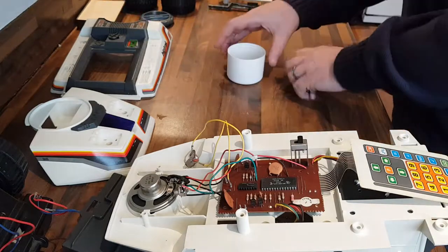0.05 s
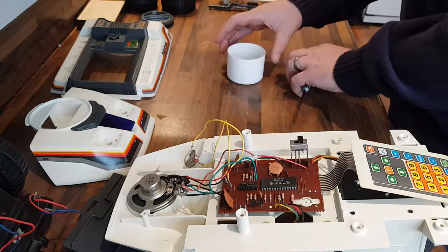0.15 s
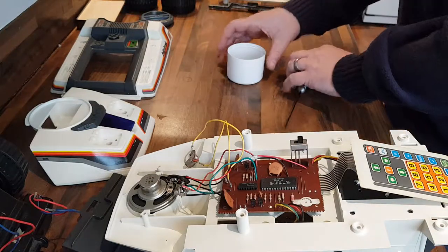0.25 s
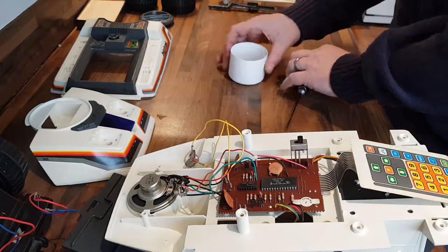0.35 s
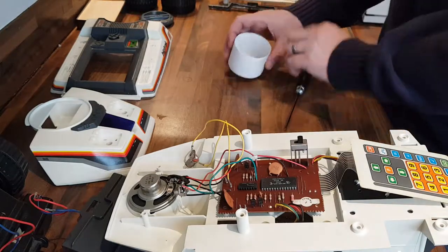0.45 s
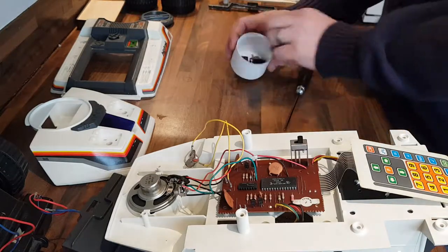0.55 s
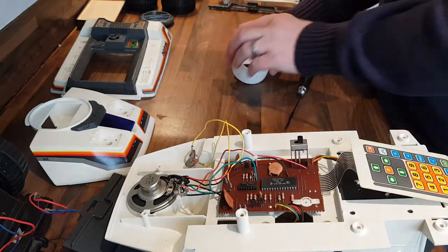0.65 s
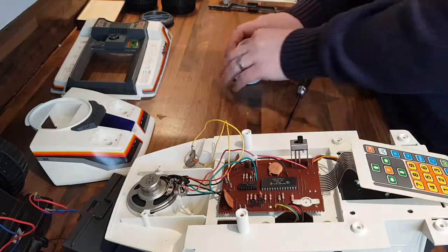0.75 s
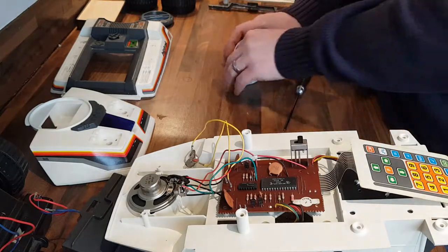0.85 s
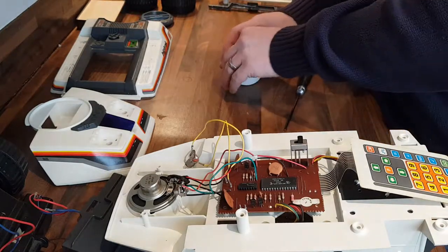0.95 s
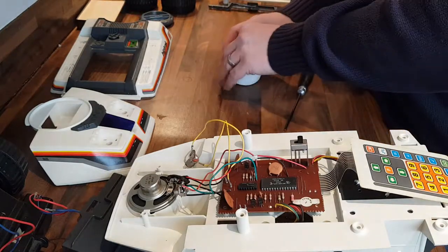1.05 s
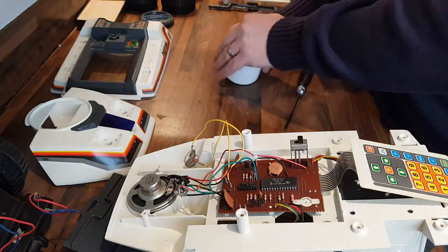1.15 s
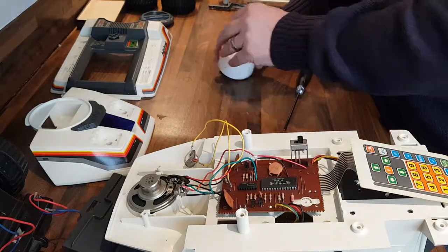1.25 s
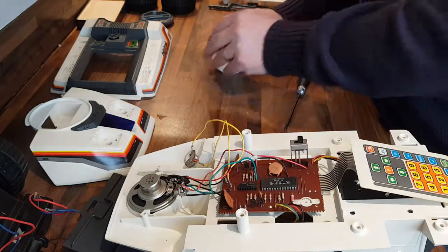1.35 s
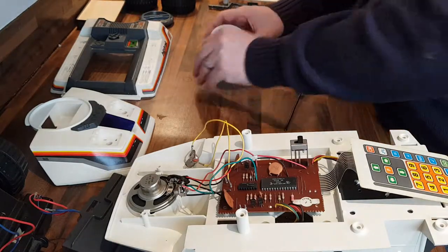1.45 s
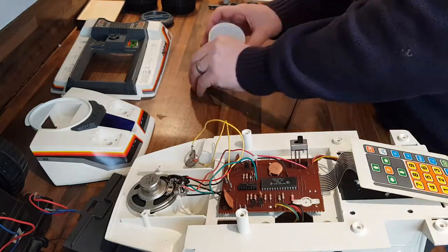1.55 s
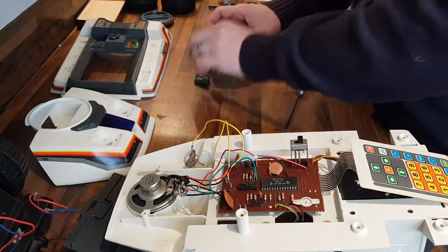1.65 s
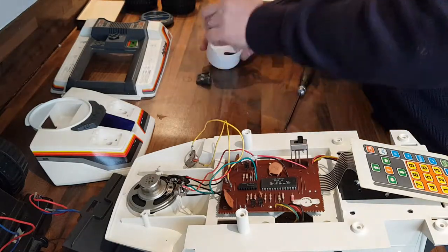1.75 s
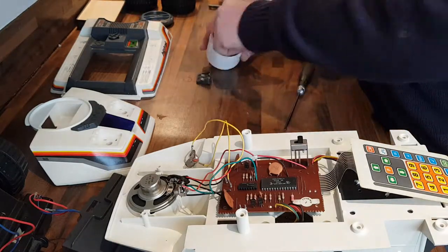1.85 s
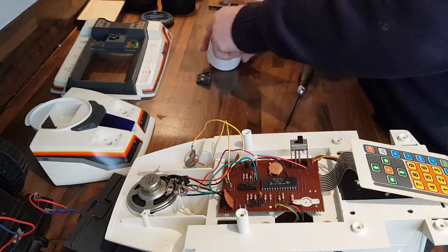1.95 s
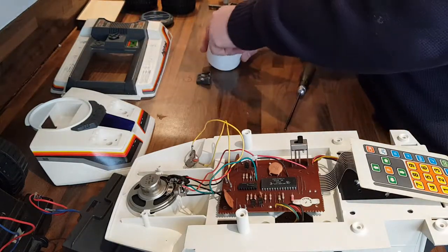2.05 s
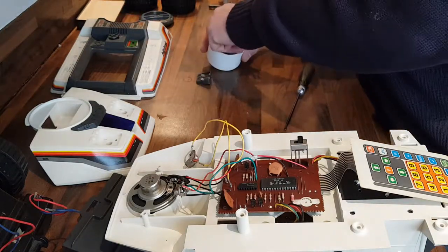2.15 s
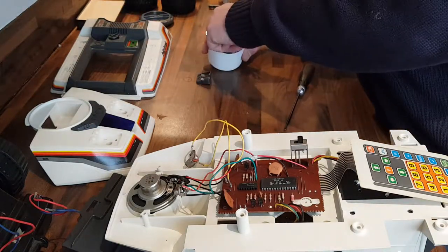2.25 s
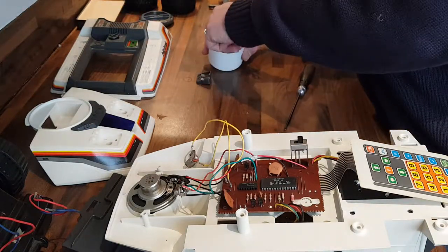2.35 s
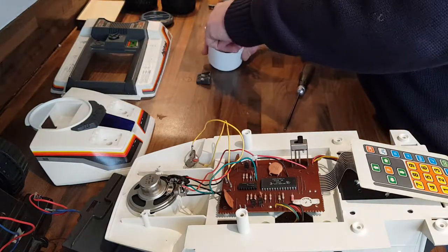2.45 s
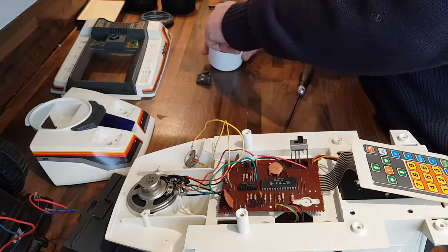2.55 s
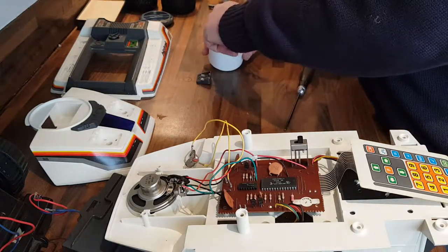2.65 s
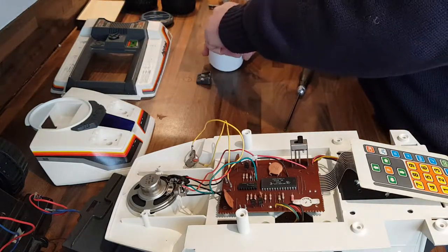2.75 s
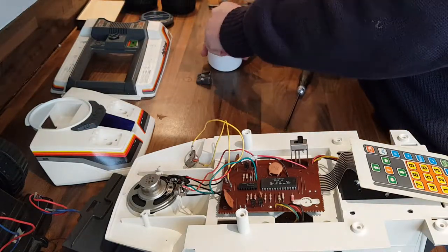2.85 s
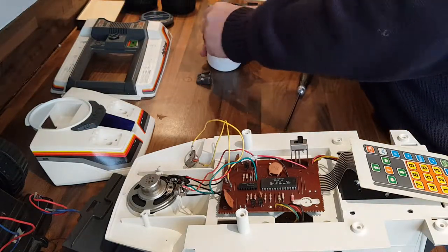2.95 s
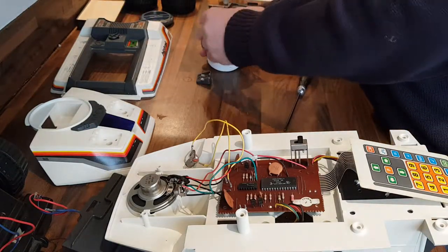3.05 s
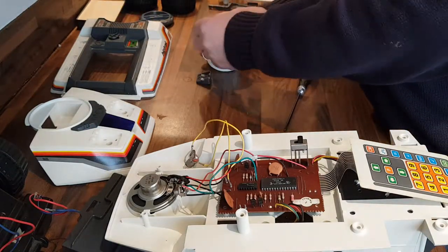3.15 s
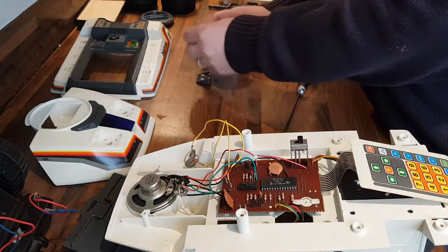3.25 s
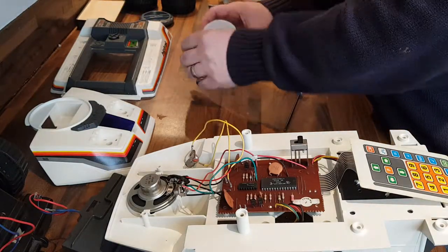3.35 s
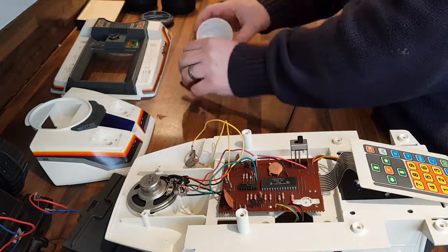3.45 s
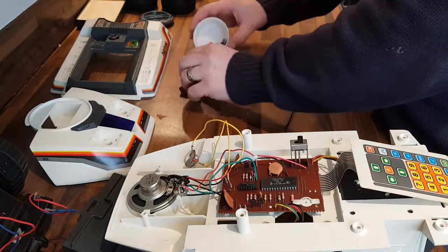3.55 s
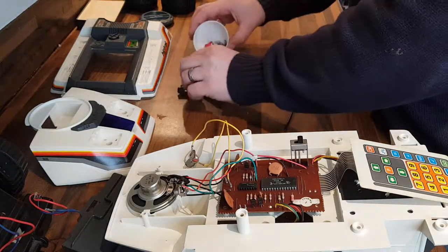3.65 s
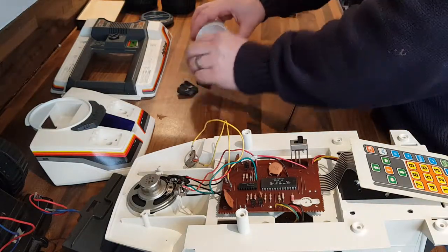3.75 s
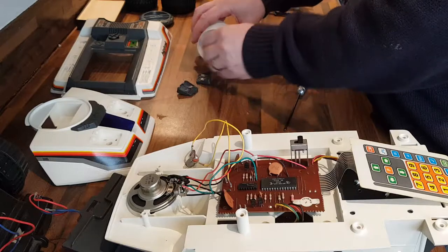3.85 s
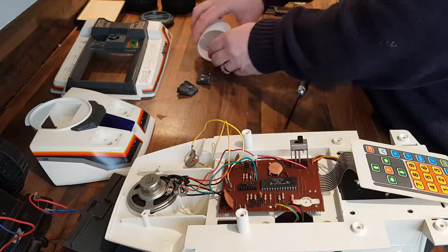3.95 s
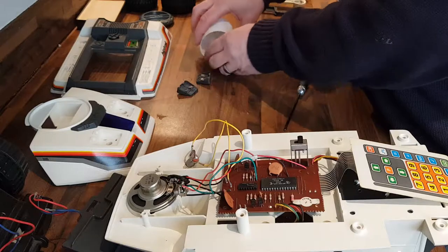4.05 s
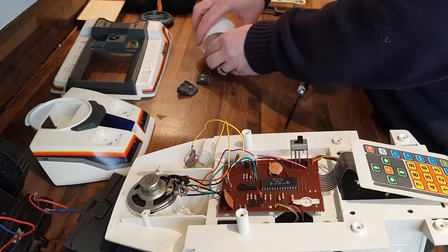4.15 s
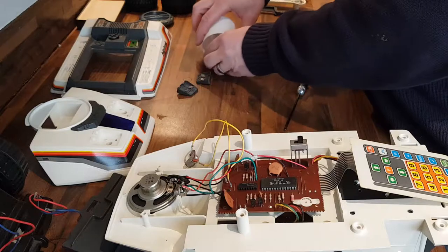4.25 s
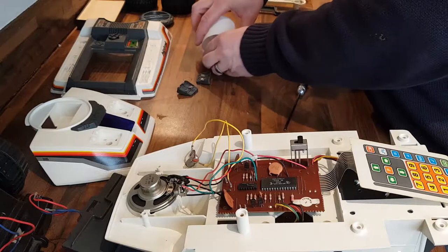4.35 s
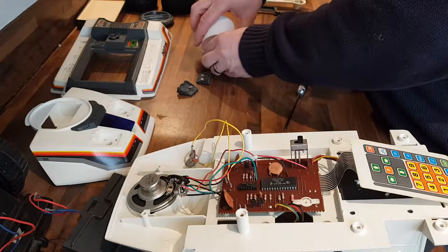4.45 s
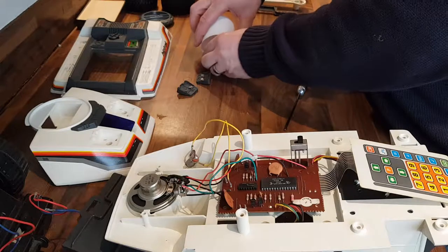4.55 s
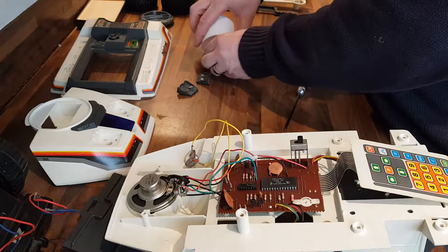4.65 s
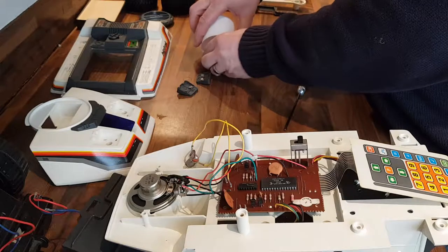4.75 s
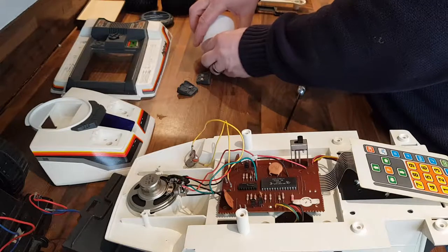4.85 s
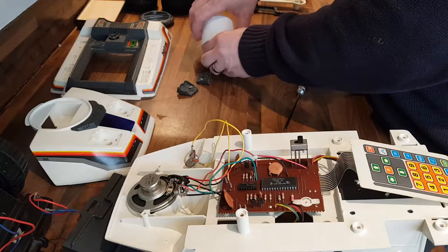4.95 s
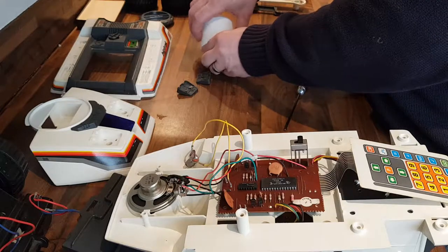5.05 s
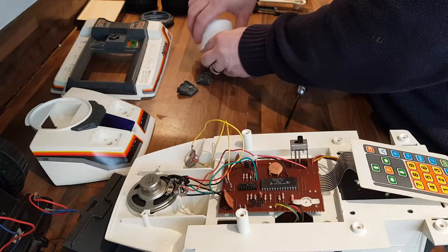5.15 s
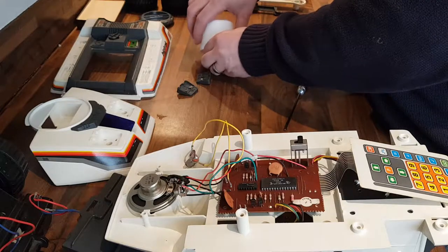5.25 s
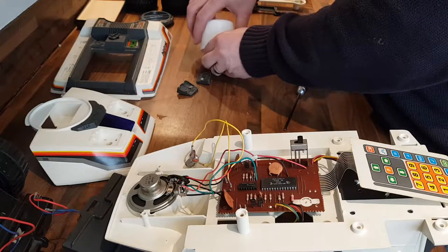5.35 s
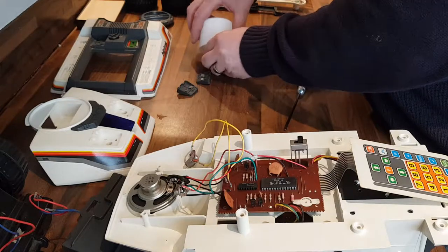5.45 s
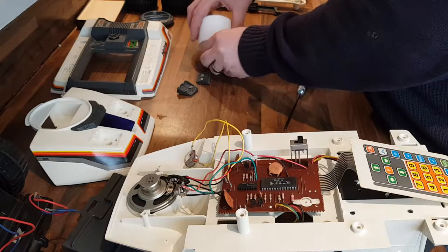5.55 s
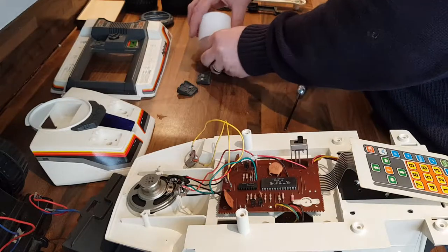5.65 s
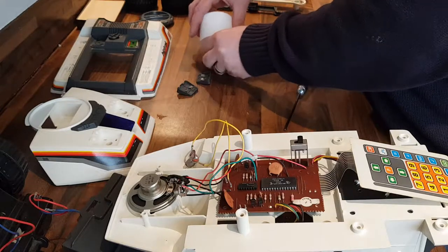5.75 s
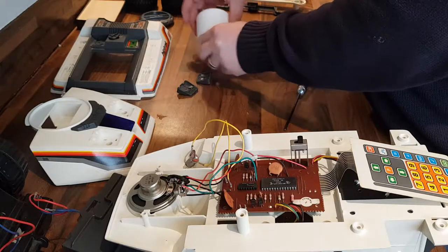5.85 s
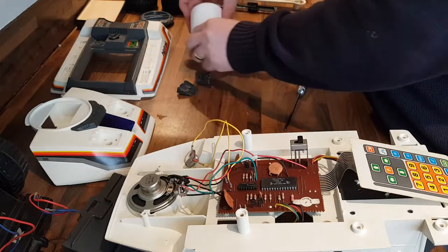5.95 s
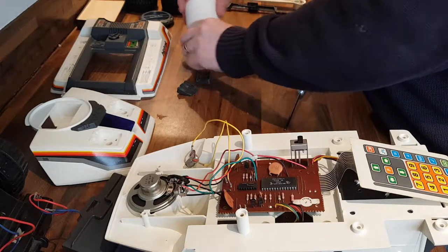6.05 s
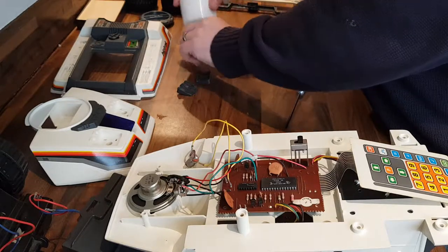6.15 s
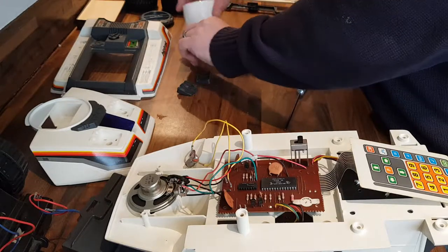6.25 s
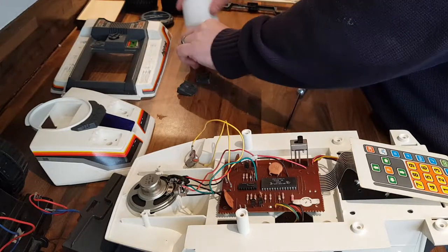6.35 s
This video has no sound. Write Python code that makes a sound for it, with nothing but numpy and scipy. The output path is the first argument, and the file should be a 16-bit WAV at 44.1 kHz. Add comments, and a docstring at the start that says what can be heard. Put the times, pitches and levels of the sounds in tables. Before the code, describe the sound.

Small steel screws give a brief hollow rattle in a plastic pot. At 0.3 seconds a screwdriver drops onto a wooden table and bounces quickly, with hard clacks, a low thud and a thin metallic ring: the loudest event. From 0.7 to 1.3 seconds the screws slide and knock inside the pot. Around 1.6 to 1.9 a few tumble onto the wood, clinking. Fingers stir the pot softly from 2 to 3 seconds, with sharper clicks near 2.6. After a light knock at 3.5, the screws are tipped out from 3.6 to 4 seconds in a bright, jingling spill with dull thumps. Another run of clicking and sliding lasts from 4.4 to 5.3, thinning to faint ticks by 5.8, with one last small tap at 6.3. Everything sounds close and slightly left, in a small room with short reverberation and faint electrical hum and hiss.

```python
"""In a small room, at a wooden table, steel screws rattle in a plastic pot, are stirred by fingers and tipped
out; a screwdriver also drops and bounces. Each impact is a brief force that excites the modes of what it
strikes: steel cracks and rings, the pot sounds hollow, and the table clacks and booms. The sliding
heap is a swarm of tiny impacts. The room reverberates, and mains hum and hiss lie under it all."""
import sys
import numpy as np
from scipy import signal
from scipy.fft import rfft, irfft, next_fast_len
from scipy.io import wavfile
from scipy.ndimage import map_coordinates

SR = 44100
rng = np.random.default_rng(int(sys.argv[2]) if len(sys.argv) > 2 else 0)


def waveform_to_disk(signal):
    """Save audio, clipped to [-1, 1], as 16-bit WAV at the path in sys.argv[1]."""
    frames = np.transpose(np.atleast_2d(signal))
    scaled = np.clip(frames, -1, 1) * 32767
    samples = np.round(scaled).astype(np.int16)
    wavfile.write(sys.argv[1], SR, samples)


N = 281799
FFT_SIZE = next_fast_len(N + SR // 2)
FREQS = np.fft.rfftfreq(FFT_SIZE, 1 / SR)


def amp(db):
    """Amplitude ratio of a level in decibels."""
    return 10 ** (np.asarray(db) / 20)


def unit(x):
    """Normalisation to an rms of 1."""
    return x / np.sqrt(np.mean(x ** 2) + 1e-20)


def pan(db):
    """Level difference: the left channel gains db and the right loses it."""
    return amp([[db], [-db]])


def along(points, hz=FREQS):
    """Interpolation of (Hz, value) points on a logarithmic frequency axis."""
    f, value = np.transpose(points)
    return np.interp(np.log(hz + 1), np.log(f + 1), value)


def filtered(x, response):
    """Linear filtering: the spectrum is multiplied by a frequency response."""
    return irfft(rfft(x, FFT_SIZE) * response, FFT_SIZE)[..., :N]


def colour(points):
    """Amplitude response of a spectral envelope of (Hz, dB) points."""
    return amp(along(points))


def modes(table):
    """Modal superposition: damped resonances (Hz, bandwidth Hz, dB) add with alternating sign."""
    return sum((-1) ** k * amp(db) * 1j * FREQS * width / (hz ** 2 - FREQS ** 2 + 1j * FREQS * width)
               for k, (hz, width, db) in enumerate(table))


def shifting_modes(x, table, radiation=1, scatter_db=3.5):
    """Modal coupling: as the struck spot moves, each mode is fed more or less."""
    knots = rng.standard_normal((len(table), 200))
    feeds = (amp(scatter_db * map_coordinates(row, [np.linspace(0, 195, N)], order=1)) for row in knots)
    return sum(filtered(x * feed, radiation * modes([mode])) for feed, mode in zip(feeds, table))


def bursts(times, gains, t60, apart):
    """Scattering draws impacts out into noise bursts; apart weights the noise unique to each channel."""
    t = np.arange(SR // 20) / SR
    age = t / t60
    noise = rng.standard_normal((len(times), 3, len(t))) * amp(-60 * age ** 1.312)
    noise *= 1 - np.exp(-age / 0.041)  # attack
    at = (np.round(times * SR).astype(int)[:, None] + np.arange(len(t))).ravel()
    gains = gains * np.ones((2, 1))
    sides = (gains[c, :, None] * (noise[:, 2] + apart * noise[:, c]) for c in range(2))
    return np.array([np.bincount(at, side.ravel(), N + SR)[:N] for side in sides])


def patter(per_s, spread_db, t60, apart):
    """Shot noise: small contacts at random moments, a few much stronger than the rest."""
    when, chance = rng.random((int(per_s * N / SR), 2)).T
    return bursts(when * N / SR, amp(-spread_db * np.log(chance + 0.018)), t60, apart)


def blows(rows, gain_db, soft_hz):
    """Contact compliance: each (seconds, dB) impulse carries little above soft_hz."""
    start, db = np.transpose(rows)
    pushes = np.bincount(np.round(start * SR).astype(int), amp(db + gain_db), N)
    return filtered(pushes, 1 / (1 + 1j * FREQS / soft_hz) ** 2)


def swells(rows, drop_db=27, roundness=1.995):
    """Incoherent swells add in power: an envelope per dB column of (peak s, rise s, fall s, dB, ..)."""
    peak, rise, fall, *levels = np.transpose(rows)
    t = np.arange(0, N / SR + .01, .002)
    late = t - peak[:, None]
    span = np.where(late < 0, rise[:, None], fall[:, None])
    shape = amp(-drop_db * np.abs(late / span) ** roundness)
    return [np.interp(np.arange(N) / SR, t, np.sqrt(amp(db) ** 2 @ shape ** 2)) for db in levels]


# Background noise. Each row: frequency in Hz, relative spectral density in dB.
NOISE_SPECTRUM = [(15, -43.5), (25, -16.5), (102, -7.5), (127, -15.5), (223, -31), (285, -29.5),
                  (420, -39.5), (516, -34.5), (1020, -39), (8830, -41.5), (16000, -39.5)]
# Its likeness at the two microphones. Each row: frequency in Hz, coherence from 0 to 1.
NOISE_COHERENCE = [(30, .93), (200, .93), (600, .3), (8000, .1)]

def hiss_and_hum(noise_db=-65, hum_hz=100, hum_db=-68.5, waver_db=1.5):
    """Diffuse noise is coherent only at long wavelengths; a wavering mains hum runs through it."""
    angle = np.arccos(along(NOISE_COHERENCE)) / 2
    shares = np.array([np.cos(angle), np.sin(angle)])
    mid, side = filtered(rng.standard_normal((2, N)), colour(NOISE_SPECTRUM) * shares)
    waver, drift = (map_coordinates(rng.standard_normal(60), [np.linspace(0, 55, N)]) for _ in range(2))
    hum = amp(hum_db + waver_db * waver) * np.sin(2 * np.pi * hum_hz * np.arange(N) / SR + 0.56 * drift)
    return amp(noise_db) * unit(mid + [side, -side]) + hum


# Where the moving parts are. Each row: time in seconds, share in the upright pot from 0 to 1.
POT_SHARE = [(0, 1), (.3, 1), (.32, 0), (.6, 0), (.65, 1), (1.62, 1), (1.66, 0), (1.9, 0), (2, 1), (3.6, 1),
             (3.66, 0)]

def in_pot():
    """Coupling to the upright pot: 1 while the moving parts sit in it, 0 while they are out."""
    return np.interp(np.arange(N) / SR, *np.transpose(POT_SHARE))


# Modes of the pot wall. Each row: frequency in Hz, bandwidth in Hz, level in dB.
WALL_MODES = [(1780, 73, 1.5), (2709, 200, 3), (3090, 470, -2), (4170, 410, -0.5)]
# Clatter outside the upright pot. Each row: frequency in Hz, level in dB.
CLATTER_SPECTRUM = [(700, -25), (1500, -3), (2300, -1.5), (3300, -1), (5000, -30.5)]

def clatter(x):
    """Forced vibration: contacts drive the wall of the upright pot; elsewhere their colour is broad."""
    share = in_pot()
    inside = filtered(x * share, modes(WALL_MODES))
    outside = filtered(x * (1 - share), colour(CLATTER_SPECTRUM))
    return inside + amp(-5) * outside


def mouth(hz=1150, width_hz=900):
    """Radiation efficiency: the small pot radiates well only near its note."""
    return modes([(hz, width_hz, 0)]) ** 2


# Slides of the heap. Each row: peak, rise and fall times in seconds, then the levels of steel chatter,
# hollow note and low clatter in dB.
HEAP_SLIDES = [(0.005, 0.3, 0.076, -42.5, -38, -40), (0.09, 0.11, 0.14, -48, -51.5, -46),
               (0.5, 0.21, 0.15, -43.5, -46.5, -31), (0.71, 0.11, 0.067, -45.5, -36.5, -37),
               (0.86, 0.13, 0.04, -42, -37, -30.5), (1.02, 0.46, 0.15, -54.5, -43, -38.5),
               (1.21, 0.069, 0.1, -45.5, -45.5, -40), (1.44, 0.051, 0.089, -62.5, -55.5, -46.5),
               (1.6, 0.041, .08, -58, -50.5, -67), (1.73, 0.13, 0.19, -52.5, -43, -33.5),
               (2.03, 0.051, 0.12, -69, -43.5, -47), (2.12, 0.12, 0.13, -52, -51.5, -45),
               (2.34, 0.15, 0.14, -59.5, -67.5, -66), (2.66, 0.067, 0.14, -42.5, -50, -43),
               (2.8, 0.22, 0.14, -61, -46.5, -36.5), (2.98, 0.21, 0.12, -56.5, -53, -43.5),
               (3.37, 0.059, 0.12, -64, -61.5, -50), (3.56, 0.082, 0.35, -62.5, -54, -49),
               (3.7, 0.097, 0.21, -49, -41.5, -35.5), (3.87, 0.32, 0.2, -43, -51, -34.5),
               (4.28, 0.34, 0.15, -63.5, -73, -88), (4.57, 0.22, 0.23, -48, -53.5, -37),
               (4.92, 0.048, 0.079, -46, -63.5, -38.5), (5.14, 0.41, 0.22, -50, -56, -40.5),
               (5.49, 0.13, 0.11, -63, -65, -57), (5.67, 0.14, 0.14, -62.5, -76.5, -70)]
# Slides under a covering hand. Each row: peak, rise and fall times in seconds, level in dB.
COVERED_SLIDES = [(3.78, 0.15, 0.24, -50.5), (4.25, 0.14, 0.2, -68.5), (4.57, 0.2, 0.12, -57.5),
                  (5.02, 0.12, 0.3, -59.5), (5.44, 0.04, 0.051, -54.5)]
# Air modes of the open and the covered pot. Each row: frequency in Hz, bandwidth in Hz, level in dB.
CAVITY_MODES = [(737.3, 90, -3), (1050, 130, 2), (1128.5, 60, 6), (1306, 100, 4.5)]
COVERED_MODE = [(611, 81, 0)]
# Body and sharp edge of a steel contact. Each row: frequency in Hz, level in dB.
BODY_SPECTRUM = [(2000, -21.5), (3500, -0.5), (4400, 1), (5800, 0), (7500, -4), (9000, -17.5),
                 (14000, -44.5)]
EDGE_SPECTRUM = [(5000, -25.5), (8500, 5), (10000, 4), (13000, 3), (15500, -6.5)]

def sliding_heap():
    """Granular noise: many tiny collisions of sliding screws excite the steel, the pot and its air."""
    chatter_gain, hollow_gain, clatter_gain = swells(HEAP_SLIDES)
    grains = patter(900, spread_db=5, t60=0.021, apart=1)
    body = unit(filtered(grains, colour(BODY_SPECTRUM)))
    edge = amp(-4 - 14 * in_pot()) * unit(filtered(grains, colour(EDGE_SPECTRUM)))  # the pot shades it
    pushes = patter(300, spread_db=5, t60=0.015, apart=1)
    covered = unit(filtered(pushes, modes(COVERED_MODE) ** 2))  # a hand over the mouth lowers the note
    upright = unit(shifting_modes(pushes, CAVITY_MODES, mouth()))
    tilted = unit(filtered(pushes, mouth()))  # only a broad colour remains
    hollow = in_pot() * upright + (1 - in_pot()) * tilted
    return (amp(1.97) * chatter_gain * (body + edge)
            + amp(-7.5) * clatter_gain * unit(clatter(grains))
            + amp(3.5) * hollow_gain * hollow
            + swells(COVERED_SLIDES)[0] * covered)


# Distinct contacts of steel. Each row: start in seconds, level in dB, then the offsets of the low
# clatter and the sharp edge in dB.
STEEL_CONTACTS = [(0.052, -32, -12.5, -18), (0.1075, -25, -2, -13.5), (0.2437, -44.5, 3, -38.5),
                  (0.318, -10.5, -6.5, -11.5), (0.3704, -13.5, -6.5, -11), (0.4244, -17.5, -3.5, -20.5),
                  (0.4659, -19.5, -6, -8), (0.4935, -25, -1, -7), (0.672, -30, -1.5, -23.5),
                  (0.7134, -24, 0.5, -39.5), (0.8002, -30, 6, -16), (0.8556, -21.5, -31.5, -10),
                  (0.9678, -33, 1, -24.5), (1.0461, -43, 3.5, -24), (1.1165, -38, -4, -30),
                  (1.1862, -28.5, 4.5, -20.5), (1.4044, -42.5, 8.5, -44), (1.5728, -25, -11.5, -29.5),
                  (1.648, -37.5, 7.5, -21), (1.6547, -18.5, 0, -14), (1.699, -30, -7, -8.5),
                  (1.72, -16.5, -20, -17), (1.811, -34, -9.5, -23.5), (2.0055, -39.5, 1.5, -41),
                  (2.066, -47.5, 3, -32), (2.0883, -27, 1, -21.5), (2.5545, -47.5, -4, -21.5),
                  (2.594, -32, -43, -20.5), (2.6288, -19, -8, -13.5), (2.6394, -18.5, -12, -13.5),
                  (2.7003, -30, 7.5, -23), (2.811, -36.5, -20.5, -33), (2.9141, -38.5, 8, -35.5),
                  (3.473, -37, -0.5, -53), (3.6077, -31.5, -6, -20), (3.6521, -15.5, -2, -12.5),
                  (3.696, -22, -2, -12.5), (3.7315, -23.5, -1, -13.5), (3.7524, -28.5, -9, -12.5),
                  (3.789, -23.5, -6, -10), (3.8204, -27, -4, -6.5), (3.853, -20, -5.5, -14),
                  (3.915, -19.5, -17, -11.5), (3.943, -28.5, -28, -28), (4.0138, -28, -15.5, -14),
                  (4.0806, -37, -28, -25), (4.2141, -44.5, -9, -23.5), (4.3993, -41, -15, -34),
                  (4.4133, -31.5, -0.5, -15.5), (4.4461, -26, -1, -16.5), (4.4733, -31.5, 2, -26.5),
                  (4.4935, -23, -4, -9.5), (4.5279, -27, -6, -8), (4.5792, -28.5, 0, -15),
                  (4.6446, -34, -2, -6.5), (4.7077, -28.5, -7, -9.5), (4.8763, -37, -6.5, -16),
                  (4.9003, -32, -17, -9), (4.9221, -31, -5, -14), (4.9684, -33.5, 2, -17.5),
                  (5.022, -27, -12, -13), (5.091, -32.5, -7, -12.5), (5.1305, -26, -24, -11.5),
                  (5.144, -24.5, -2, -14.5), (5.154, -28.5, -9.5, -17), (5.2021, -25.5, -10, -10),
                  (5.243, -37, -13, -5), (5.263, -40, -25, -6.5), (5.468, -34.5, -11.5, -22),
                  (5.5873, -41, -36, -37), (5.6072, -35.5, -18, -29), (5.6459, -41, -9, -7),
                  (5.7576, -41, -28.5, -7), (6.3432, -34.5, -0.5, -41.5)]

def steel_clicks():
    """A short impact has a broad spectrum: steel cracks, and what it lands on adds a lower clatter."""
    start, db, low_db, edge_db = np.transpose(STEEL_CONTACTS)
    pan_db = rng.normal(1, 0.62, len(start))  # contacts happen at scattered places
    gains = amp([db + pan_db, db - pan_db])
    body = bursts(start, gains * amp(2), t60=0.024, apart=1)
    edge = bursts(start, gains * amp(edge_db + 1.5), t60=0.037, apart=0.45)
    low = bursts(start, gains * amp(low_db + 10.5), t60=0.04, apart=0.15)
    return filtered(body, colour(BODY_SPECTRUM)) + filtered(edge, colour(EDGE_SPECTRUM)) + clatter(low)


# Blows on the table. Each row: start in seconds, level in dB, hardness as a high-mode offset in dB.
TABLE_BLOWS = [(0.054, -34.5, -2.5), (0.339, -24.5, -0.5), (0.368, -23, 1.5), (0.457, -42, 9.5),
               (0.547, -42, 5), (0.672, -43.5, 2), (0.798, -39.5, -0.5), (1.186, -53.5, 8.5),
               (1.397, -45.5, 1), (1.58, -34.5, -13.5), (1.762, -40.5, 1), (2.267, -52.5, -17),
               (3.471, -41.5, -4), (3.65, -43, -2), (3.682, -29, -8), (3.85, -36.5, -2),
               (5.407, -53.5, -0.5)]
# Low and high modes of the table top. Each row: frequency in Hz, bandwidth in Hz, level in dB.
TABLE_LOW_MODES = [(89.5, 5, -7), (126.4, 7, 2), (172, 22, 0), (215, 60, -3.5)]
TABLE_HIGH_MODES = [(269.4, 110, -8.5), (333, 22, -2.5), (405, 12, 1.5), (540, 77, -2.5)]

def table_thuds(shudder_db=-19, rise_s=0.013, fall_s=0.18):
    """Plate vibration: harder blows reach higher modes, and rolling things keep the top shuddering."""
    start, db, hard_db = np.transpose(TABLE_BLOWS)
    pushes = np.zeros((2, N))  # one row for the low modes, one for the high
    pushes[:, np.round(start * SR).astype(int)] = amp([db + 43, db + hard_db + 41])
    shudders = swells([(at + rise_s, rise_s, fall_s, level + shudder_db, level + hard + shudder_db - 0.5)
                       for at, level, hard in TABLE_BLOWS])
    rolling = patter(200, spread_db=2, t60=0.0024, apart=0.25)
    responses = modes(TABLE_LOW_MODES), modes(TABLE_HIGH_MODES)
    return sum(filtered(push, top) + shudder * unit(filtered(rolling, top))
               for push, shudder, top in zip(pushes, shudders, responses))


# Free tumbles. Each row: start and end in seconds, ring gain in dB, part (0 screwdriver shaft,
# 1 long screw, 2 short screw).
TUMBLES = [(0.314, .62, 6.7, 0), (0.69, 0.712, 6.2, 0), (0.867, .88, 11, 1), (1.636, 1.897, 9.2, 1),
           (3.641, 3.947, 3.9, 2)]
# Modes of those three parts, a list for each. Each row: frequency in Hz, bandwidth in Hz, level in dB.
STEEL_MODES = [
    [(4850, 99, -5), (5700, 70, 3.5), (6530, 39, 1.5), (7750, 45, 8), (8360, 48, 2), (10505, 80, 1.5),
     (11640, 220, -1), (13200, 80, -3.5)],
    [(5980, 120, -2.5), (6400, 62, 1.5), (7735, 40.3, 4.5), (10800, 67, -0.5), (11520, 100, 8),
     (13980, 120, -2.5)],
    [(6410, 41, 3.5), (7740, 53, 1), (8530, 31, -1.5), (11020, 55, 7.5), (12900, 52, 2.5)],
]

def with_steel_rings(clicks, heap, crack_share=0.79, heap_share=0.8):
    """Free vibration: while a part tumbles, contacts ring its modes and the clicks lose some crack."""
    coupling = np.zeros((len(STEEL_MODES), N))
    for start, end, db, part in TUMBLES:
        coupling[round(part), round(start * SR):round(end * SR)] = amp(db)
    contacts = clicks * np.where(coupling.any(axis=0), crack_share, 1) + heap
    drive = clicks + heap_share * heap
    return contacts + sum(shifting_modes(drive * gain, part) for gain, part in zip(coupling, STEEL_MODES))


# Hard clacks on the table: the screwdriver handle bouncing, later screws landing.
# Each row: start in seconds, level in dB.
TABLE_CLACKS = [(0.317, -16.5), (0.342, -5), (0.366, -4.5), (0.372, -13), (0.38, -14.5), (0.392, -9.5),
                (0.411, -11.5), (0.429, -17.5), (1.402, -27.5), (1.77, -24.5), (3.47, -27), (3.652, -21.5),
                (3.683, -32), (3.7, -23.5), (3.852, -29)]
# Modes of a clack. Each row: frequency in Hz, bandwidth in Hz, level in dB.
CLACK_MODES = [(795, 60, -5), (1036, 60, -2.5), (1140, 110, 0), (1330, 150, 0.5), (1673, 140, -2),
               (1990, 60, -2), (2306, 80, -3.5), (2625, 80, -7)]

def table_clacks():
    """Damped resonance: hard things meet the table with a brief chatter, and the modes die quickly."""
    start, db = np.transpose(TABLE_CLACKS)
    chatter = bursts(start, amp(db + 8.5), t60=0.02, apart=0.9)
    return filtered(blows(TABLE_CLACKS, gain_db=27, soft_hz=4000) + chatter, modes(CLACK_MODES))


# Blows on the pot. Each row: start in seconds, level in dB.
POT_BLOWS = [(0.672, -30), (0.698, -32.5), (0.8, -22), (0.83, -28.5), (0.858, -29.5), (0.988, -37.5),
             (1.036, -35), (1.186, -28.5), (1.442, -40.5), (2.011, -32.5), (2.086, -38), (2.126, -40),
             (2.365, -49), (2.628, -38), (2.701, -34.5), (2.915, -46), (6.344, -53.5)]

def pot_knocks():
    """Cavity resonance: a quick push sets the air in the pot ringing."""
    return filtered(blows(POT_BLOWS, gain_db=44.5, soft_hz=1996), mouth() * modes(CAVITY_MODES))


# Phase difference. Each row: frequency in Hz, lead of the left microphone in radians.
LEFT_LEAD = [(0, -19.5), (1120, 1.69), (2760, 1.12), (8700, 6), (12000, 4), (16100, -14)]
# Level difference. Each row: frequency in Hz, dB added on the left and taken from the right.
LEFT_BIAS = [(300, 0), (2000, -1.5), (5000, 2.5), (9000, -1), (14000, 0.5)]

def direct_sound(x):
    """Path difference: the direct wave reaches the two microphones with different phase and strength."""
    sides = np.array([[1], [-1]])
    return filtered(x, np.exp(.5j * sides * along(LEFT_LEAD)) * amp(sides * along(LEFT_BIAS)))


# Decay of the room. Each row: frequency in Hz, reverberation time (60 dB) in seconds.
ROOM_T60 = [(150, 1), (1000, 0.2), (5000, 0.22), (14000, 0.016)]

def reverberation(x, delay_samples=200):
    """Absorption gives each frequency its own decay rate; the tail changes as hands and pot move."""
    out = np.zeros((2, N + SR))
    step = SR // 4  # a fresh tail every quarter second
    for start in range(0, N, step):
        hz, t, noise = signal.stft(rng.standard_normal((2, SR // 2)), SR, nperseg=256)
        decay = amp(-60 * t / along(ROOM_T60, hz)[:, None])
        tail = signal.istft(noise * decay, SR, nperseg=256)[1]
        wet = signal.fftconvolve(x[:, start:start + step], tail / np.linalg.norm(tail[0]), axes=1)
        arrival = start + delay_samples
        out[:, arrival:arrival + wet.shape[1]] += wet
    return out[:, :N]


def scene():
    """Superposition: bright impacts with their reverberation, thuds and background, a little left."""
    steel = with_steel_rings(steel_clicks(), sliding_heap() * pan(1.2))
    bright = steel + (table_clacks() + pot_knocks()) * pan(0.8)
    thuds = table_thuds() * pan(1.5)
    in_room = amp(-2.5) * direct_sound(bright) + amp(-8.5) * reverberation(bright)
    return in_room + thuds + hiss_and_hum() * pan(1.5)


def record(dry):
    """Band limiting: nothing above the cutoff passes."""
    cutoff_hz = 15900
    return filtered(dry, FREQS < cutoff_hz)


dry = scene()
out = record(dry)
waveform_to_disk(out)
```